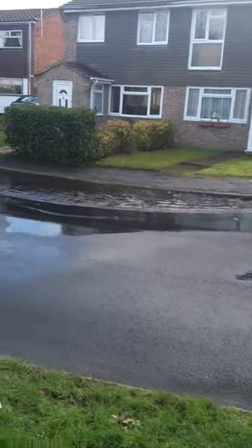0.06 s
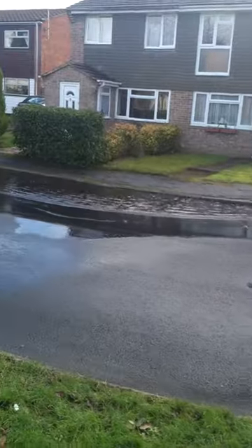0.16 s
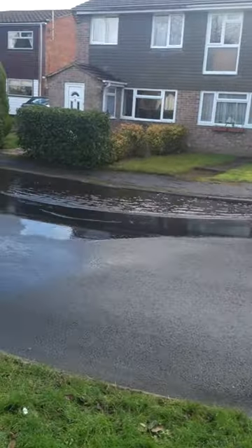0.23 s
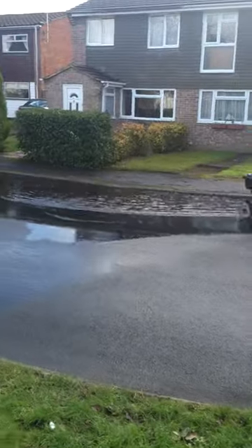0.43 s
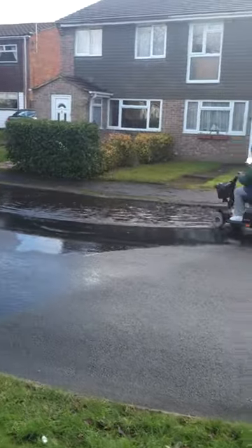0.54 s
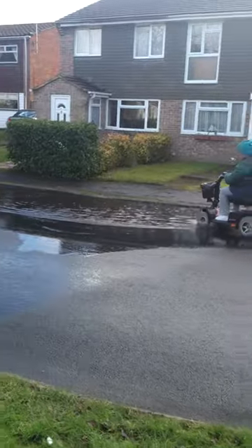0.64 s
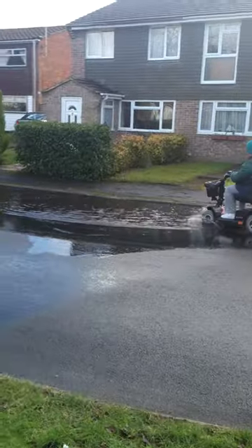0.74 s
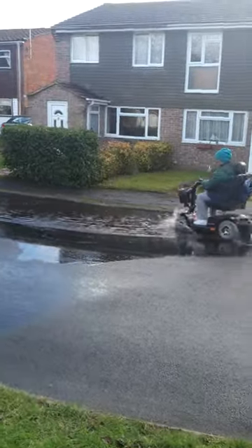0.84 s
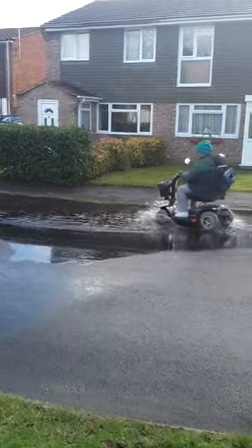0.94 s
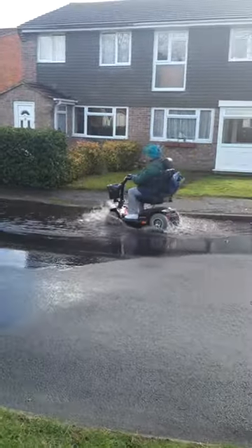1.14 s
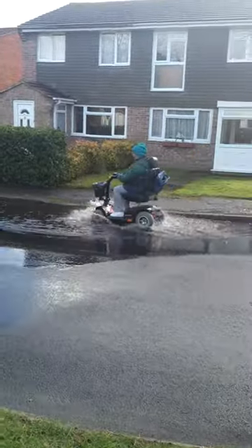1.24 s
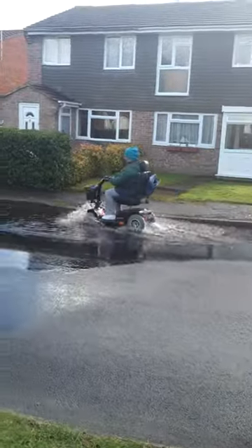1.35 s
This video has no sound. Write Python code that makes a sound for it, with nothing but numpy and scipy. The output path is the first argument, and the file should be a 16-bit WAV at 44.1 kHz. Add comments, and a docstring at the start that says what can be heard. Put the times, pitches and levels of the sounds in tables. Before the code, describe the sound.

Wheels splash and spray through a puddle after a gust of wind thumps the microphone.

```python
"""A mobility scooter rolls through a long puddle across a quiet street.
First, turbulent gusts buffet the microphone, hardest near 0.27 s, while a few drops plink.
From about 0.6 s the wheels slap into the water and throw up a fine spray of tiny ringing bubbles.
In the last half second the water patters back and larger, lower bubbles churn in the wake.
House fronts return a faint echo of the water throughout."""
import sys
import numpy as np
from scipy import signal
from scipy.fft import rfft, irfft
from scipy.io import wavfile
from scipy.ndimage import uniform_filter1d

SR = 44100
rng = np.random.default_rng(int(sys.argv[2]) if len(sys.argv) > 2 else 0)


def put_to_file(sound):
    """Save the sound as 16-bit audio at rate SR, in the file named by the first command-line argument."""
    columns = np.atleast_2d(sound).T  # one column per channel
    safe = np.clip(columns, -1, 1)
    whole_steps = np.round(safe * 32767)
    wavfile.write(sys.argv[1], SR, whole_steps.astype(np.int16))


N = 61739
T = np.arange(N) / SR
FREQS = np.fft.rfftfreq(N, 1 / SR)

# single eddies striking the microphone: t/s, level/dB, f/Hz
EDDIES = [(0.0258, -33, 81), (0.1375, -29, 124), (0.1795, -26.5, 125), (.199, -26.5, 87),
          (0.2322, -22.5, 254), (0.25, -13, 268), (0.2695, -3, 270), (0.298, -15.5, 280),
          (0.315, -12.5, 302), (0.3319, -10.5, 104), (0.3442, -12, 225), (0.4, -17, 144),
          (0.4547, -17, 181), (0.469, -19, 247), (0.496, -21, 178), (0.5239, -18, 165), (.573, -19, 142),
          (0.6067, -15, 133), (0.629, -18, 114), (0.67, -20, 80), (0.745, -30, 80), (.966, -27.5, 167),
          (1.014, -26.5, 197), (1.06, -27, 134), (1.191, -29.5, 228), (1.262, -24.5, 120)]


def amp(db):
    """Amplitude ratio of a level in decibels."""
    return 10 ** (np.asarray(db) / 20)


def unit(x):
    """Normalisation to an rms of one."""
    return x / np.sqrt(np.mean(x ** 2) + 1e-20)


def curve(points):
    """Linear interpolation of breakpoints at every sample."""
    return np.interp(T, *np.transpose(points))


def colour(x, spectrum):
    """Spectral shaping by a curve on a log-frequency axis, at unit rms."""
    hz, db = np.transpose(spectrum)
    gain = amp(np.interp(np.log(FREQS + 1), np.log(hz), db))
    return unit(irfft(rfft(x) * gain, N))


def wander(rate_hz):
    """Low-pass noise: a smooth random fluctuation."""
    return unit(irfft(rfft(rng.standard_normal(N)) * np.exp(-(FREQS / rate_hz) ** 2), N))


def street():
    """Distant sources merge into a stationary noise."""
    # hush of the street: f/Hz, relative level/dB
    spectrum = [(30, -25), (100, 5), (300, 1), (700, -0.5), (1100, 0), (1900, -13), (3500, -15),
                (7000, -27), (10000, -32), (13000, -25), (16000, -27)]
    return amp(-56) * colour(rng.standard_normal(N), spectrum)


def turbulence(spectrum, window_samples):
    """Coloured noise, steadied by dividing by its running rms envelope."""
    noise = colour(rng.standard_normal(N), spectrum)
    power = uniform_filter1d(abs(signal.hilbert(noise)) ** 2, window_samples)
    return unit(noise / np.sqrt(abs(power) + 0.014))


def wind():
    """Turbulent pressure rumbles; strong gusts add a brighter flutter that bunches around each eddy."""
    # gusts at the microphone: t/s, level/dB
    gusts = [(0, -41.5), (.018, -60), (.03, -40.5), (.065, -46), (.09, -53), (.15, -53), (.172, -39),
             (.195, -40), (.216, -41.5), (.25, -21), (.272, -17.5), (.287, -21), (.305, -22.5), (.335, -22),
             (.355, -24.5), (.375, -33), (.398, -32.5), (.44, -27), (.49, -33), (.555, -32.5), (.61, -28),
             (.675, -36), (.705, -40.5), (.745, -36), (.82, -39.5), (.915, -48.5), (.955, -34), (.985, -47),
             (1.05, -35.5), (1.13, -45.5), (1.19, -32.5), (1.23, -52), (1.275, -39), (1.325, -55),
             (1.37, -41.5), (1.4, -47)]
    # low rumble: f/Hz, relative level/dB
    rumble_spectrum = [(20, -46), (35, 2), (52, 2.5), (72, 5), (110, 0), (170, -4), (250, -13), (350, -17),
                       (500, -30), (900, -65), (2000, -88)]
    # brighter flutter: f/Hz, relative level/dB
    flutter_spectrum = [(60, -28), (160, -25), (260, -13.5), (360, -5), (500, -16.5), (700, -22.5),
                        (1000, -46), (1600, -52), (4000, -81)]
    gust_db = curve(gusts)
    rumble = amp(gust_db) * turbulence(rumble_spectrum, window_samples=900)
    flutter_db = -26 + 1.61 * (gust_db + 17)  # grows faster than the rumble
    flutter = amp(flutter_db) * turbulence(flutter_spectrum, window_samples=400)
    puffs = 0.39 + sum(np.exp(-((T - at) / .006) ** 2) for at, _, _ in EDDIES)
    return rumble + puffs * flutter


def buffets(decay_cycles=0.51, cutoff_hz=1900):
    """Each eddy is a pressure cusp with a few swings around it, thumping at its own pitch."""
    pressure = np.zeros(N)
    for at, db, hz in EDDIES:
        cycles = (T - at) * hz
        envelope = np.exp(-np.minimum(abs(cycles) / decay_cycles, 20))
        pressure += amp(db) * envelope * np.cos(2 * np.pi * cycles)
    return irfft(rfft(pressure) * np.exp(-(FREQS / cutoff_hz) ** 2), N)


def house_fronts(x, t60=0.13, delay_s=.022):
    """Reflection from the walls behind the road: convolution with sparse, decaying echoes."""
    echoes = rng.standard_normal(N) * (rng.random(N) < 2000 / SR)  # 2000 per second
    response = echoes * (T > delay_s) * amp(-60 * T / t60)
    return signal.fftconvolve(x, response / np.linalg.norm(response))[:N]


def bubbles(per_s, low_hz, high_hz, decay_cycles, spread_db, glide, sizes=36):
    """Bubble resonance: damped oscillators of many sizes start at random and rise in pitch."""
    out = np.zeros(N)
    for hz in np.geomspace(low_hz, high_hz, sizes):
        age = np.arange(0, 5 * decay_cycles / hz, 1 / SR) * hz / decay_cycles  # in time constants
        envelope = (1 - np.exp(-8 * age)) * np.exp(-age)
        ring = envelope * np.sin(2 * np.pi * decay_cycles * age * (1 + glide * age))
        onsets = rng.random(N) < per_s / sizes / SR
        strength = amp(spread_db * np.minimum(rng.exponential(1, N), 3.5))
        polarity = rng.choice([-1, 1], N)
        out += hz * signal.oaconvolve(onsets * polarity * strength, ring)[:N]
    return unit(out)


def clumps(x, depth_db, width_hz=500, length_s=0.029):
    """Random modulation in time and frequency: patches of the spectrum swell as drops cluster."""
    f, t, spectrogram = signal.stft(x, SR, nperseg=512, noverlap=384)
    across, along = np.fft.fftfreq(len(f), f[1])[:, None], np.fft.fftfreq(len(t), t[1])
    smoothing = np.exp(-(across * width_hz) ** 2 - (along * length_s) ** 2)
    field = unit(np.fft.ifft2(np.fft.fft2(rng.standard_normal(spectrogram.shape)) * smoothing).real)
    return signal.istft(spectrogram * amp(depth_db * field), SR, nperseg=512, noverlap=384)[1][:N]


def water(rings, spectrum, mist_db, clump_db, flicker_db, flicker_hz):
    """Incoherent sum of ringing bubbles and a noise-like mist of droplets, clumped and flickering."""
    mixture = clumps(rings + amp(mist_db) * rng.standard_normal(N), clump_db)
    return unit(colour(mixture, spectrum) * amp(flicker_db * wander(flicker_hz)))


def drops(rise_s=0.0015, decay_s=0.0012):
    """Each drop's impact gives a soft tick and a heavily damped ring."""
    # single drops: t/s, level/dB, f/Hz
    plinks = [(0.0247, -39, 3100), (0.0544, -38.5, 3730), (0.1705, -41, 3320), (0.3364, -27, 3450),
              (.433, -37, 3520), (0.4609, -38, 4060), (.5472, -32, 3950), (1.313, -28, 3220)]
    # impact tick: f/Hz, relative level/dB
    tick_spectrum = [(1000, -27), (3400, 2), (9000, -26), (13000, -42)]
    tick = amp(-4) * colour(rng.standard_normal(N), tick_spectrum)
    out = np.zeros(N)
    for start, db, hz in plinks:
        age = np.maximum(T - start, 0)
        envelope = 2 * (1 - np.exp(-age / rise_s)) * np.exp(-age / decay_s)
        out += amp(db) * envelope * (np.sin(2 * np.pi * hz * age) + tick)
    return out


def churn():
    """Resonant frequency falls with radius, so the wake's larger bubbles gurgle low."""
    # strength of the wake: t/s, level/dB
    levels = [(0, -63), (.55, -62.5), (.75, -51), (.93, -59), (1.1, -55), (1.22, -48.5), (1.3, -50.5),
              (1.4, -48)]
    # gurgle: f/Hz, relative level/dB
    spectrum = [(150, -38), (400, -6), (650, 7), (1100, -6), (1600, -3.5), (3000, -5), (8000, -52)]
    rings = bubbles(per_s=900, low_hz=396, high_hz=1738, decay_cycles=6, spread_db=2.0, glide=0.023)
    gurgle = water(rings, spectrum, mist_db=2.5, clump_db=0.6, flicker_db=-0.6, flicker_hz=59.3)
    return amp(curve(levels)) * gurgle


def patter():
    """Air entrainment: thrown water rains back on the puddle and sets small bubbles ringing."""
    # strength of the falling water: t/s, level/dB
    levels = [(0, -53.5), (.12, -63), (.3, -57), (.5, -50.5), (.75, -57), (.88, -46.5), (1.02, -43.5),
              (1.12, -41), (1.25, -43), (1.4, -42)]
    # patter: f/Hz, relative level/dB
    spectrum = [(400, -55), (1000, -2), (1450, -10), (2200, -1.5), (2420, -7), (2650, -1), (2850, -5),
                (3300, 2.5), (4100, -3), (4700, -8), (6200, -10), (7000, -13.5), (10300, -10), (12000, -15),
                (14500, -35)]
    rings = bubbles(per_s=4000, low_hz=1092, high_hz=8860, decay_cycles=6.7, spread_db=1.5, glide=0.0048)
    rain = water(rings, spectrum, mist_db=6, clump_db=1.5, flicker_db=0.8, flicker_hz=71)
    return amp(curve(levels)) * rain


def spray():
    """Strong damping broadens the tiniest bubbles' resonances into the fizz of spray off the tyres."""
    # strength of the spray: t/s, level/dB
    levels = [(0, -59.5), (.15, -59), (.3, -52.5), (.45, -53), (.56, -49.5), (.62, -47), (.72, -42.5),
              (.79, -45), (.85, -43), (.99, -47.5), (1.1, -51.5), (1.4, -49)]
    # fizz: f/Hz, relative level/dB
    spectrum = [(300, -24), (1500, -8.5), (2500, -1), (3500, 0), (4200, -1), (5200, 0), (6200, -2),
                (7200, -9), (8300, -8.5), (9300, -2.5), (10200, -0.5), (11200, -9), (12300, -21),
                (15000, -29)]
    rings = bubbles(per_s=5400, low_hz=2000, high_hz=11860, decay_cycles=2.05, spread_db=1.5, glide=0.014)
    fizz = water(rings, spectrum, mist_db=1, clump_db=1.6, flicker_db=1.0, flicker_hz=88)
    return amp(curve(levels)) * fizz


def splashes(rise_s=.003, decay_s=.008, cutoff_hz=10700):
    """Impact excitation: the wheels slap the water into short, band-limited bursts of crackle; the two early
    bursts, at 0.039 s and 0.335 s, are a drop's tick and splat."""
    # slaps and spurts: t/s, duration/s, level/dB, centre f/Hz, width/octaves
    slaps = [(0.039, 0.0056, -58.5, 11000, 0.31), (0.335, .012, -47, 4460, 1.1),
             (0.6, 0.028, -54.5, 10100, 0.16), (0.694, 0.038, -50, 10200, 0.13),
             (0.583, 0.078, -46, 1470, 1.14), (0.61, 0.029, -50.5, 4900, 0.23),
             (0.661, 0.0087, -37.5, 1840, 0.44), (0.687, 0.07, -43, 500, 0.88),
             (0.695, 0.063, -46, 1990, 0.29), (0.703, 0.0033, -41, 5040, 0.15),
             (0.715, 0.02, -42, 5100, 0.15), (0.824, .024, -39.5, 3270, 0.89),
             (0.972, 0.045, -46.5, 5460, 0.26), (1.019, .012, -41, 3780, 0.21)]
    rings = bubbles(per_s=5000, low_hz=355.5, high_hz=8040, decay_cycles=3.8, spread_db=4.5, glide=0.018)
    crackle = (rings + amp(-3) * rng.standard_normal(N)) * amp(2 * wander(rate_hz=260))
    f = FREQS + 1  # keeps the logarithm finite
    spectrum = rfft(crackle) / (1 + (f / cutoff_hz) ** 8)
    out = np.zeros(N)
    for start, duration, db, hz, octaves in slaps:
        band = np.exp(-.5 * (np.log2(f / hz) / octaves) ** 2)
        burst = irfft(spectrum * band, N)
        attack = np.clip((T - start) / rise_s, 0, 1)
        envelope = attack * np.exp(-np.maximum(T - start - 0.66 * duration, 0) / decay_s)
        rms = np.sqrt(np.average(burst ** 2, weights=envelope ** 2))
        out += amp(db) * envelope * burst / rms
    return out


def scene():
    """Superposition of the street's hush, the water, its echo and the wind."""
    puddle = spray() + patter() + churn() + splashes() + drops()
    return (street() + puddle + amp(-13.5) * house_fronts(puddle) + wind() + buffets())[None]


def record(dry, low_hz=44, high_hz=15450):
    """Band limiting removes the deepest bass and the highest treble."""
    f = np.fft.rfftfreq(2 * N, 1 / SR)
    high_pass = 1 - 1 / (1 + (f / low_hz) ** 6)
    x = irfft(rfft(dry, 2 * N) * high_pass, 2 * N)[:, :N]
    low_pass = signal.firwin(511, high_hz, window=("kaiser", 9), fs=SR)
    return signal.oaconvolve(x, low_pass[None], "same")


dry = scene()
out = record(dry)
put_to_file(out)
```